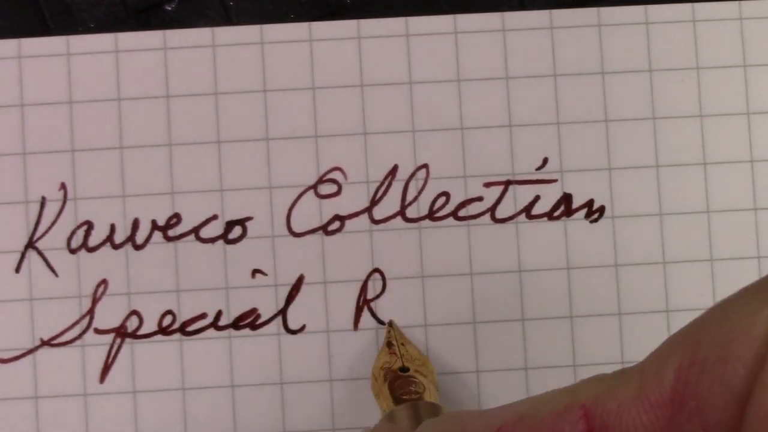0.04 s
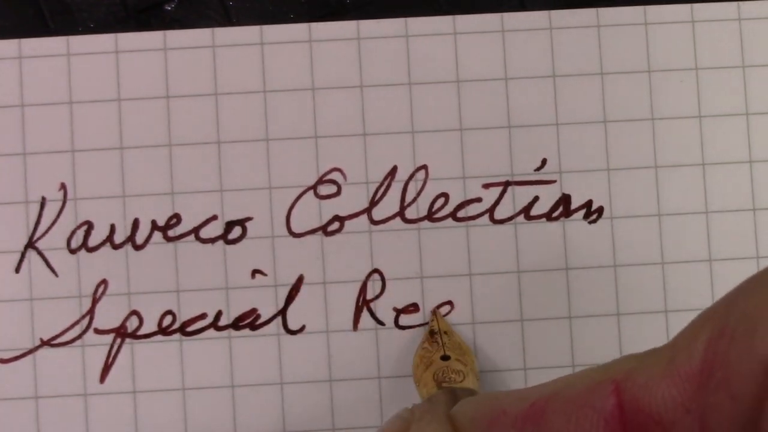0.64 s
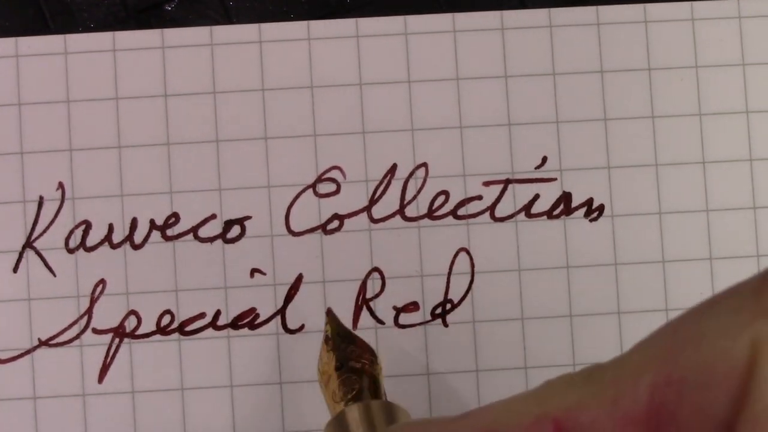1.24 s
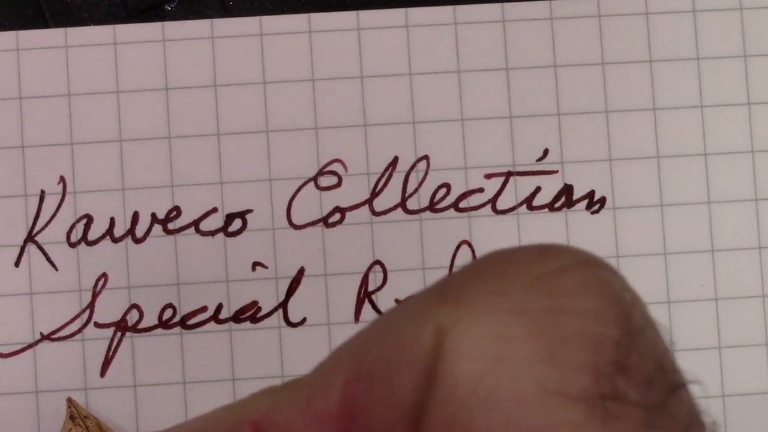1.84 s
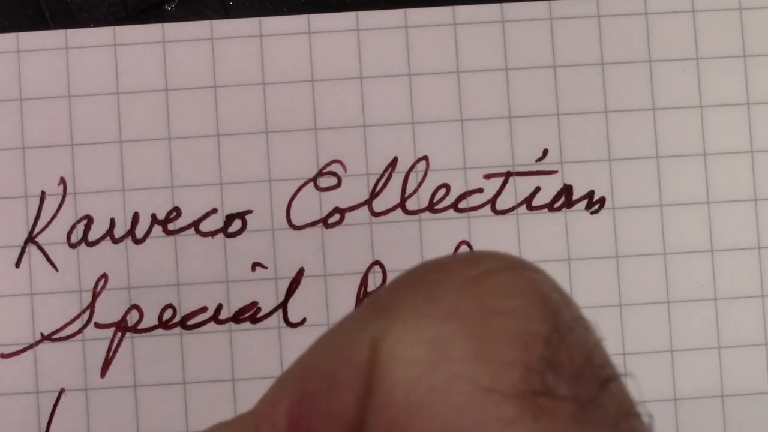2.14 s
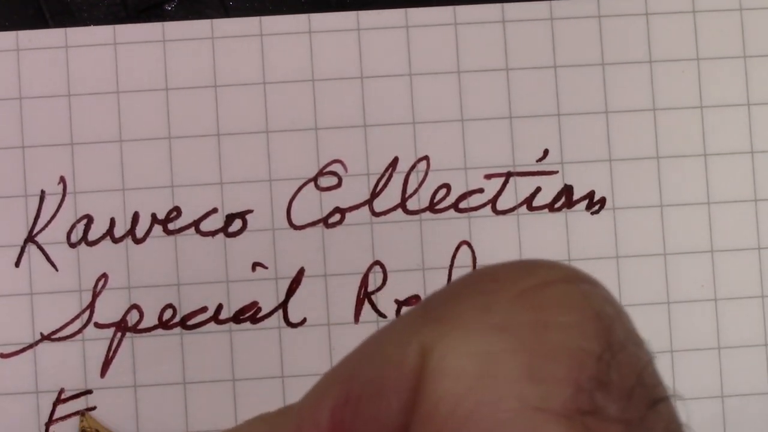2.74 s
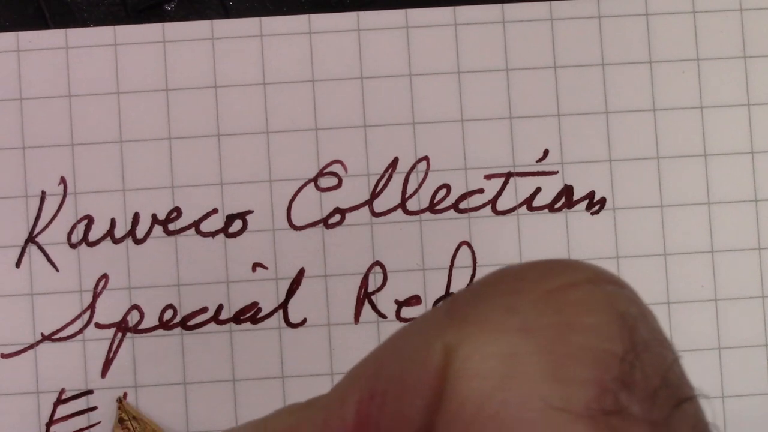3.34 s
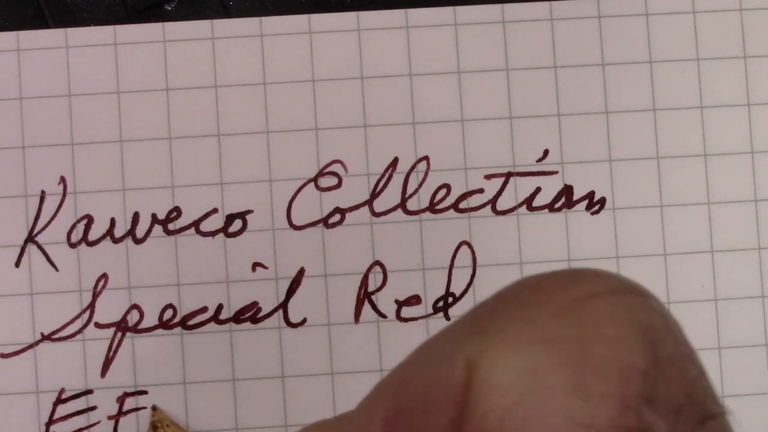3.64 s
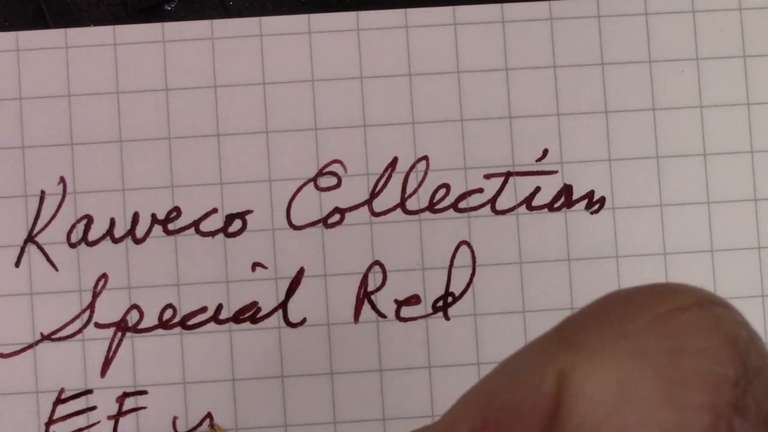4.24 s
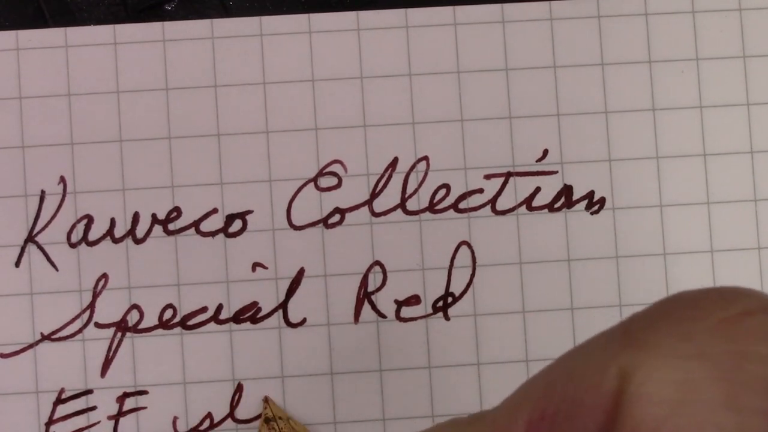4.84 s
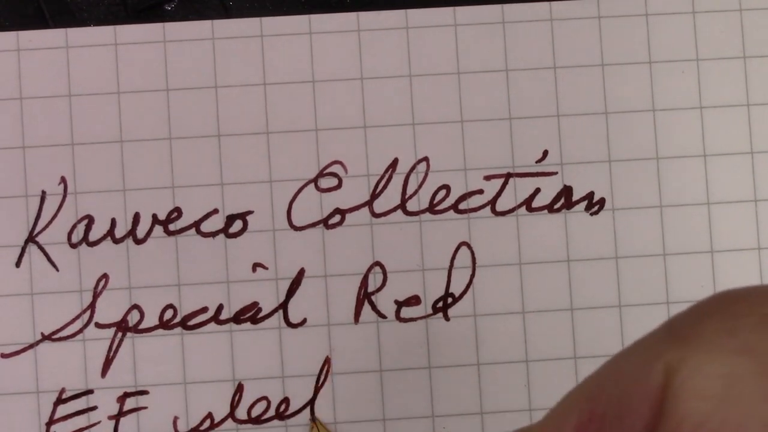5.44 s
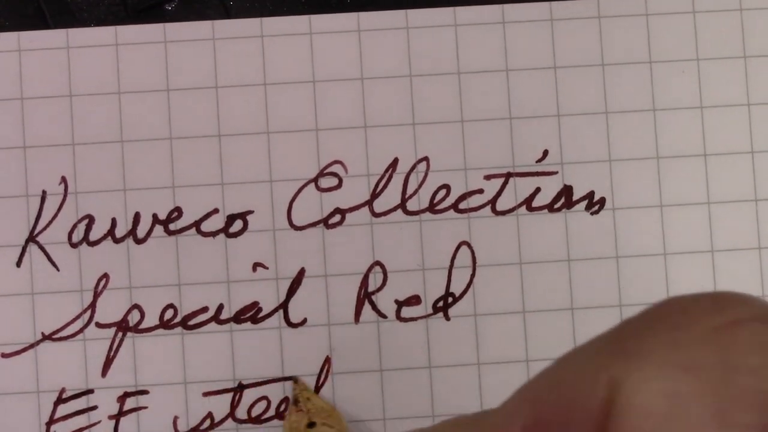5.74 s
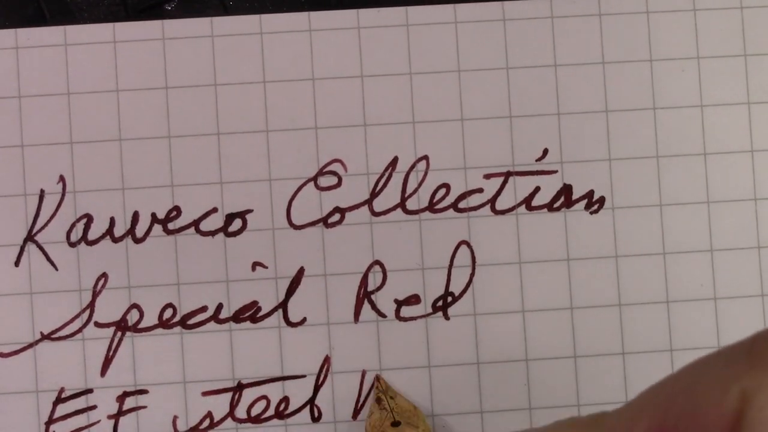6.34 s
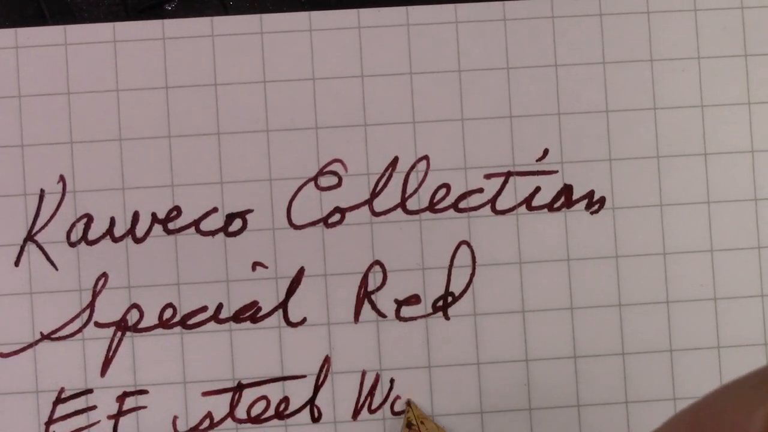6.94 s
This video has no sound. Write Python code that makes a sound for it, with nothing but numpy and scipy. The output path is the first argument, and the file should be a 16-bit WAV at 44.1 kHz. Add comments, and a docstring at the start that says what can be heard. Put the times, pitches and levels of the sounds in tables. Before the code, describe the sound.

Close, quiet handwriting with a steel pen on a paper pad, with light taps, soft desk rumbles and a steady hum.

```python
"""At a desk in a quiet room, a steel fountain pen writes a few words on a paper pad, close by.
The nib catches on paper fibres and shakes the desk, pad, sheet and pen. It ticks as it lands or
snags, and the lifted pen clicks in the fingers. The hand slides over the sheet and rocks the desk.
Under it all lie room noise, a low hum, a faint whine and hiss; only the hiss spreads to the sides."""
import sys
import numpy as np
from scipy import signal
from scipy.fft import rfft, irfft
from scipy.io import wavfile
from scipy.ndimage import uniform_filter1d

SR = 44100
rng = np.random.default_rng(int(sys.argv[2]) if len(sys.argv) > 2 else 0)


def transcribe(signal):
    """Save signal, clipped to [-1, 1], as a 16-bit WAV file at the path in sys.argv[1]."""
    frames = np.atleast_2d(signal).T
    limited = np.clip(frames, -1, 1)
    pcm = np.round(limited * 32767).astype(np.int16)
    wavfile.write(sys.argv[1], SR, pcm)


N = 308259
TIME = np.arange(N) / SR


# the tones at which each part likes to ring: (pitch [Hz], width [Hz], relative level [dB])
DESK_TONES = [(180, 16, -3), (241.6, 22.7, 3.5), (309, 70, -2), (385, 60, 2)]
PAD_TONES = [(403, 34, -3.5), (458, 28, 2), (521, 72, -2), (664, 49, -8)]
SHEET_TONES = [(783, 86, -0.5), (907, 65, 1.5), (989, 72, -3), (1132, 36, -8.5), (1209, 24, -9.5),
               (1351, 44, -12)]
BARREL_TONES = [(1460, 89, -3.5), (1690, 80, -2.5), (2080, 167, 0), (2420, 135, 3.5), (2646, 113, 3.5),
                (2880, 248, -2), (4300, 460, -15), (4830, 240, -14.5), (5880, 350, -26), (7440, 210, -22),
                (11300, 2900, -29)]
NIB_TONES = [(4690, 730, 8), (5680, 810, 8.5), (7370, 900, 5.5), (8700, 1100, 5.5), (10500, 850, 3.5),
             (12300, 1600, 1.5), (14900, 1600, -6)]

def pen():
    """Strokes and taps make the same five parts ring: desk, pad, sheet, pen barrel and nib."""
    on_desk, on_pad, on_sheet, on_barrel, on_nib = strokes(grain_db=1.77, shared=0.44, sharpness=3.1)
    knock, slap, ring, tick = taps(boosts_db=[20, 19, 20.5, 10], skid_s=0.0069, push_s=0.0008)
    desk = soften(resonate(on_desk + from_db(-6) * knock, DESK_TONES), hz=735)
    pad = soften(resonate(on_pad + knock, PAD_TONES), hz=1210)
    sheet = soften(resonate(on_sheet + slap, SHEET_TONES), hz=1980)
    barrel = resonate(on_barrel + ring, BARREL_TONES)
    nib = resonate(tick + soften(on_nib, hz=6570), NIB_TONES)
    return desk + pad + sheet + barrel + nib


# each move of the nib: (start [s], speeding up [s], slowing down [s], strength [dB],
# extra scratch from the nib's angle [dB], extra lean on the desk [dB])
PEN_STROKES = [(-0.007, 0.0059, 0.033, -58, 3, 0), (0.226, 0.049, 0.041, -59.5, 0.5, -3),
               (0.376, 0.018, 0.11, -46, -2.5, 1), (0.474, 0.038, 0.097, -52, 2.5, -1),
               (0.633, 0.0047, 0.081, -43.5, -1, -2), (0.725, 0.062, 0.11, -41.5, 4.5, -1),
               (0.864, 0.018, 0.092, -34.5, 0.5, 0), (2.08, 0.039, 0.052, -37.5, -0.5, 2),
               (2.376, 0.04, 0.076, -49, 1, 1), (2.63, 0.024, 0.094, -48, -2, -1),
               (2.878, 0.044, 0.078, -46.5, -1, -1.5), (3.09, 0.043, 0.06, -40.5, 0, 2.5),
               (3.393, 0.015, 0.039, -54, 2.5, -5), (3.585, 0.032, 0.097, -51, 0.5, 0),
               (4.061, 0.012, 0.057, -50, 2, 0.5), (4.107, 0.044, 0.086, -45.5, -5.5, 0.5),
               (4.224, 0.075, 0.048, -48.5, -1.5, 0.5), (4.44, 0.046, 0.059, -44.5, -7.5, -1.5),
               (4.49, 0.062, 0.057, -41.5, -0.5, 1.5), (4.645, 0.016, 0.095, -45, 0.5, 1.5),
               (4.715, 0.053, 0.15, -49.5, 0, -2), (4.855, 0.063, 0.12, -52.5, 3, 1),
               (4.976, 0.069, 0.094, -46.5, -0.5, -0.5), (5.163, 0.0075, 0.11, -49.5, -2, 0),
               (5.24, 0.092, 0.047, -36, 1, -2.5), (5.396, 0.035, 0.077, -33.5, -1, 2),
               (5.495, 0.047, 0.033, -55, 2.5, -3), (5.702, 0.034, 0.068, -28.5, 0, -10),
               (6.194, 0.019, 0.078, -39, 1, -0.5), (6.304, 0.042, 0.051, -39, 0, -1),
               (6.41, 0.029, 0.066, -44, 1, 2), (6.498, 0.051, 0.056, -44, 0.5, -1),
               (6.83, 0.0089, 0.052, -48, 0.5, 0.5), (6.894, 0.007, 0.12, -54, -2.5, -1)]
# how much of a stroke reaches desk, pad, sheet, barrel and nib, a row for each:
# (gain at usual strength [dB], growth with stroke strength [dB per dB])
STROKE_REACH = [(2, 0.71), (-1.2, 1.0354), (-2.5, 0.8551), (-5, 0.7954), (-19.5, 0.53)]

def strokes(grain_db, shared, sharpness, usual_db=-45):
    """The nib's rubbing shakes all five parts: light strokes sound thin, heavy ones favour the pad."""
    speed, powers = np.zeros(N), np.zeros((len(STROKE_REACH), N))
    reach_db, growth = np.transpose(STROKE_REACH)
    for start, rise, fall, db, scratch_db, lean_db in PEN_STROKES:
        move = movement(start, rise, fall)
        speed += move
        extra_db = [lean_db, 0, scratch_db, scratch_db, 0]
        levels_db = usual_db + reach_db + growth * (db - usual_db) + extra_db
        powers += from_db(levels_db)[:, None] ** 2 * move ** sharpness
    roughness = from_db(grain_db * drift(per_s=260))   # the paper is rougher in some spots
    common = np.sqrt(shared) * slips(speed, per_s=4500, spread_db=2.5)   # reaches all parts alike
    forces = []
    for power in powers:
        own = np.sqrt(1 - shared) * slips(speed, per_s=7000, spread_db=1.5)
        forces.append(np.sqrt(power) * rms_one(roughness * (common + own)))
    return forces


def slips(speed, per_s, spread_db):
    """Paper fibres catch and let go in tiny jerks of uneven size, more often at higher speed."""
    chance = np.clip(per_s * (.3 + speed) / SR, 1e-4, 1)
    sizes = from_db(spread_db * np.minimum(rng.exponential(1, N), 4))
    signs = rng.choice([-1, 1], N)
    happens = rng.random(N) < chance
    return rms_one(sizes * signs * happens / np.sqrt(chance))


# the nib lands or snags: (time [s], relative knock in the pad [dB],
# slap of the loose sheet above the knock [dB], ring of the pen above the knock [dB])
NIB_TAPS = [(0.196, -49, -11, -1), (0.411, -37, -8.5, -10.5), (0.511, -40.5, -7.5, -5), (0.64, -36, -4, -9),
            (0.744, -30.5, -10, -27), (0.879, -31, 2, -4.5), (0.901, -28, -3, -19), (0.914, -33, -15, -15),
            (1.028, -33.5, -8.5, -16), (1.273, -42.5, -7, -8), (2.106, -34.5, 3, -14),
            (2.317, -46.5, -3, -4.5), (2.645, -40, -5, -13), (2.899, -40.5, -5, -17),
            (2.958, -47.5, 2, 4.5), (3.057, -42.5, -1, -8), (3.326, -42, -9, -10),
            (3.387, -34.5, -7.5, -13), (3.638, -31, -6.5, -21), (3.666, -33.5, -19, -13),
            (3.847, -46.5, -9, -6), (4.027, -47, -4, -1.5), (4.661, -33, -11, -12), (5.166, -43, -8, -18),
            (5.474, -33, -20, -8), (5.645, -38, -3, -1.5), (5.729, -27.5, 2, -12), (5.987, -43, -9, -9),
            (6.157, -47.5, -4, 1.5), (6.211, -34, -12, -16), (6.438, -35, -6, -15), (6.634, -46.5, -5, -5),
            (6.775, -46, -10, -2), (6.836, -47, 5, -8)]
# the lifted pen clicks in the fingers: (time [s], relative barrel level [dB], relative nib level [dB])
FINGER_CLICKS = [(1.391, -41, -47), (1.426, -47.5, -32), (1.471, -46, -51)]

def taps(boosts_db, skid_s, push_s):
    """A tap gives pad and sheet one clean push, barrel and nib a short skid; finger clicks only skid."""
    forces = np.zeros((4, N))   # pad, sheet, barrel, nib: the same order as boosts_db
    age = np.arange(SR // 20) / SR
    push = signal.unit_impulse(len(age), round(SR * push_s))
    contacts = [(s, db, db + slap, db + ring, db + ring) for s, db, slap, ring in NIB_TAPS]
    contacts += [(s, -np.inf, -np.inf, barrel, nib) for s, barrel, nib in FINGER_CLICKS]
    for start, *parts_db in contacts:
        skid = rng.standard_normal(len(age)) * np.exp(-(age / skid_s) ** 2)
        skid /= np.linalg.norm(skid)
        gains = from_db(np.array(parts_db) + boosts_db)
        at = round(start * SR)
        forces[:, at:at + len(age)] += gains[:, None] * [push, push, skid, skid]
    return forces


# the side of the hand slides over the sheet: (start [s], speeding up [s], slowing down [s], level [dB])
HAND_SLIDES = [(0.915, 0.054, 0.064, -45), (1.01, 0.14, 0.14, -51.5), (1.25, 0.083, 0.071, -52),
               (1.39, 0.073, 0.062, -54.5), (1.5, 0.071, 0.15, -54.5), (3.601, 0.11, 0.095, -47),
               (5.755, 0.093, 0.092, -46.5)]
# the tone colour of skin on paper: (pitch [Hz], relative level [dB])
SKIN_COLOUR = [(300, -3), (1000, -9), (1500, -11), (2000, -6.5), (2450, -2), (2800, -1), (3300, -9.5),
               (5000, -10), (7000, -15), (10000, -19.5), (16000, -25)]

def hand(flutter_db, judder_db, sharpness):
    """Sliding skin makes a soft, bright hush that grows with speed; it catches and shakes desk and pad."""
    glide = sum(from_db(db) * movement(*timing) ** sharpness for *timing, db in HAND_SLIDES)
    level = glide * from_db(flutter_db * drift(per_s=90))
    catches = slips(level / level.max(), per_s=370, spread_db=6)
    judder = soften(resonate(catches, DESK_TONES + PAD_TONES[1:]), hz=1000)
    return level * (noise(SKIN_COLOUR) + from_db(judder_db) * judder)


# the hand shifts its weight on the desk: (time [s], level [dB])
HAND_SHOVES = [(0.28, -49), (0.44, -43.5), (0.68, -33.5), (0.8, -40), (0.94, -39), (1.04, -37),
               (2.04, -42.5), (2.37, -39.5), (2.63, -40), (2.91, -36), (3.1, -36.5), (3.43, -32),
               (3.65, -33.5), (4.08, -40.5), (5.07, -35.5), (5.56, -43), (5.69, -33.5), (5.79, -38),
               (6.2, -39), (6.56, -41.5), (6.82, -43), (6.93, -42)]

def desk_sway(hz, wander, rumble_db, rest_db, stroke_db, rise_s=0.088, fall_s=0.11):
    """The desk rumbles around its lowest tone: a little at rest, more with each stroke and shove."""
    pitch_hz = hz * (1 + wander * drift(per_s=14))
    swing = np.sqrt(2) * np.sin(2 * np.pi * np.cumsum(pitch_hz) / SR)
    swing += from_db(rumble_db) * desk_rumble()
    even_swing = swing / np.sqrt(uniform_filter1d(swing ** 2, size=SR // 14) + 1e-9)
    pushes = HAND_SHOVES + [(start + rise, stroke_db) for start, rise, *_ in PEN_STROKES]
    power = sum(from_db(db) ** 2 * movement(s - rise_s, rise_s, fall_s) ** 4 for s, db in pushes)
    return np.sqrt(from_db(rest_db) ** 2 + power) * even_swing


# the tone colour of the rocking desk: (pitch [Hz], relative level [dB])
RUMBLE_COLOUR = [(28, -3), (45, 0.5), (90, -1.5), (150, -14.5), (300, -16.5), (1000, -45), (4000, -80)]

def desk_rumble():
    """The rocking desk also makes a deep noise with no clear pitch."""
    return noise(RUMBLE_COLOUR)


# hum of the mains power: (pitch [Hz], level [dB])
HUM_TONES = [(60, -56.5), (120, -54.5)]
# electronic whine: (multiple of its base pitch [times], level [dB])
WHINE_TONES = [(6, -86), (7, -86), (8, -84.5), (9, -81), (10, -81.5), (11, -82.5), (12, -81), (13, -82),
               (14, -84), (15, -83.5), (16, -86), (17, -89)]
# the tone colours of room noise and hiss: (pitch [Hz], relative level [dB])
ROOM_COLOUR = [(41, -54), (70, -6), (135, -6.5), (228, -11), (394, -17), (664, -20), (834, -20.5),
               (913, -20.5), (1120, -23.5), (1230, -25), (2270, -26.5), (2660, -29), (7060, -35),
               (16000, -39)]
HISS_COLOUR = [(25, -12), (120, -7), (500, 5), (2000, -4.5), (4000, 3), (9000, 1.5), (13000, 0.5),
               (16000, -1.5)]

def background(room_db, hiss_db, whine_base_hz):
    """Room noise, mains hum and a thin, wavering whine sit in the middle; hiss spreads to the sides."""
    whine_cycles = np.cumsum(whine_base_hz * (1 + 0.000406 * drift(per_s=8))) / SR
    tones = [(hz * TIME, db) for hz, db in HUM_TONES]
    tones += [(multiple * whine_cycles, db) for multiple, db in WHINE_TONES]
    hum_and_whine = sum(np.sqrt(2) * from_db(db) * np.sin(2 * np.pi * (cycles + rng.random()))
                        for cycles, db in tones)
    room = from_db(room_db) * noise(ROOM_COLOUR)
    hiss = from_db(hiss_db) * noise(HISS_COLOUR) * np.array([[1], [-1]])   # opposite left and right
    return hum_and_whine + room + hiss


def resonate(force, tones):
    """A shaken object rings at all its tones at once; the narrower a tone, the longer it lasts."""
    click = signal.unit_impulse(SR // 8)
    ringing = 0
    for k, (hz, width, db) in enumerate(tones):
        decay = np.exp(-np.pi * width / SR)
        poles = [1, -2 * decay * np.cos(2 * np.pi * hz / SR), decay ** 2]
        gain = (-1) ** k * from_db(db) * (1 - decay ** 2)   # every other tone is flipped
        ringing = ringing + gain * signal.lfilter([1, 0, -1], poles, click)
    return signal.oaconvolve(force, ringing / np.linalg.norm(ringing))[:N]


def soften(x, hz):
    """A soft material swallows the highs above hz."""
    return signal.sosfilt(signal.butter(3, hz, fs=SR, output="sos"), x)


def movement(start, rise, fall):
    """The speed of one move: from rest up to full speed (1) and back to rest."""
    return np.sin(np.pi / 2 * np.interp(TIME, np.cumsum([start, rise, fall]), [0, 1, 0]))


def noise(colour):
    """Noise of power 1 with the given tone colour, fading away below its lowest pitch."""
    hz, db = np.transpose(colour)
    freqs = np.arange(N // 2 + 1) * SR / N + 1e-6
    gain = from_db(np.interp(np.log(freqs), np.log(hz), db))
    low_fade = np.minimum(freqs / hz[0], 1) ** 2
    return rms_one(irfft(rfft(rng.standard_normal(N)) * gain * low_fade, N))


def drift(per_s):
    """A random wobble of power 1 that heads for a new value per_s times a second."""
    points = rng.standard_normal(int(N / SR * per_s) + 2)
    return rms_one(np.interp(TIME * per_s, np.arange(len(points)), points))


def from_db(db):
    """Turn decibels into a number to multiply by."""
    return 10 ** (np.asarray(db) / 20)


def rms_one(x):
    """Scale a signal so that its average power is 1."""
    return x / np.sqrt(np.mean(x ** 2) + 1e-20)


def scene():
    """Pen, hand and desk sit in the centre, over the quiet background."""
    sway = desk_sway(hz=50.15, wander=.16, rumble_db=-1.5, rest_db=-47.5, stroke_db=-42)
    writing = pen() + hand(flutter_db=1.5, judder_db=-4.5, sharpness=1.4)
    return writing + sway + background(room_db=-51, hiss_db=-67.5, whine_base_hz=757.3)


def record(dry, cutoff_hz=15850):
    """The very highest treble is cut off steeply."""
    treble_cut = signal.firwin(301, cutoff_hz, fs=SR)
    return signal.oaconvolve(dry, treble_cut[None], mode="same", axes=1)


dry = scene()
out = record(dry)
transcribe(out)
```